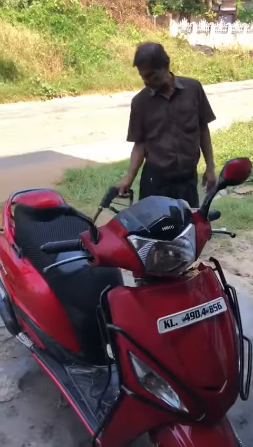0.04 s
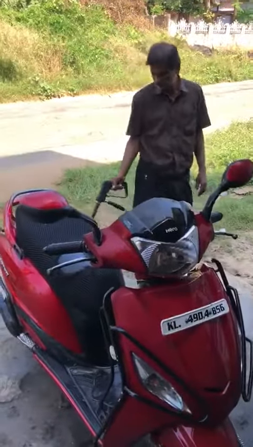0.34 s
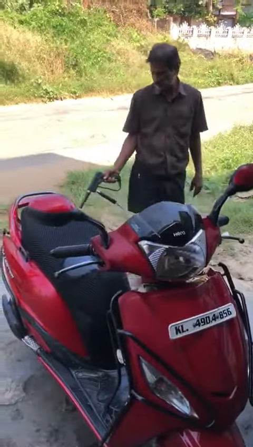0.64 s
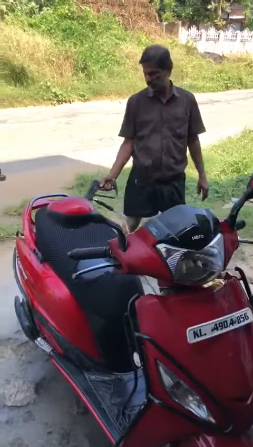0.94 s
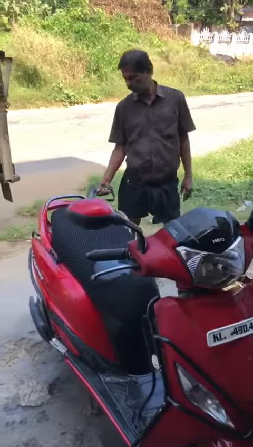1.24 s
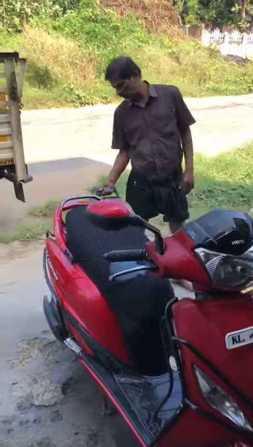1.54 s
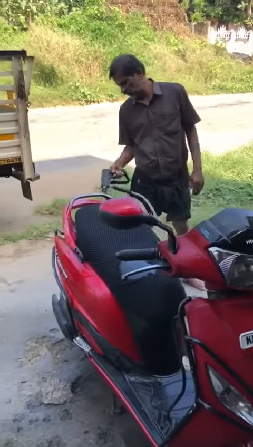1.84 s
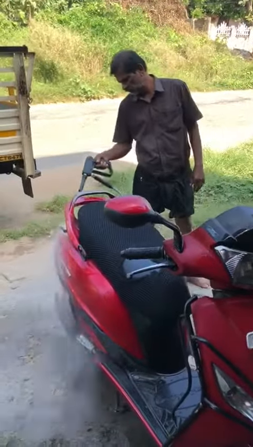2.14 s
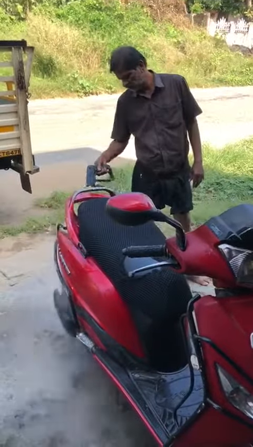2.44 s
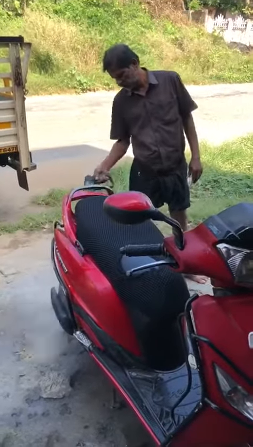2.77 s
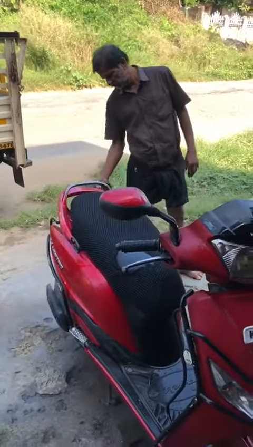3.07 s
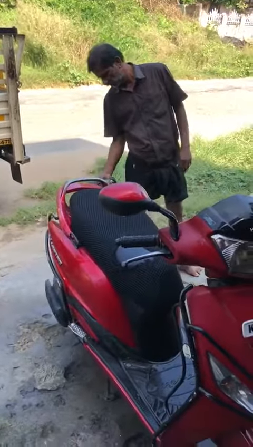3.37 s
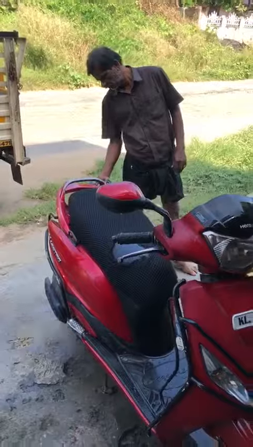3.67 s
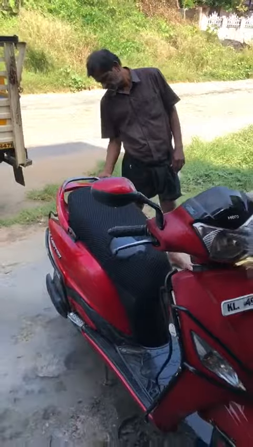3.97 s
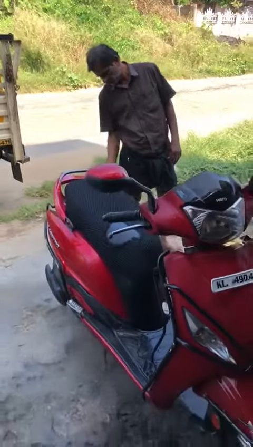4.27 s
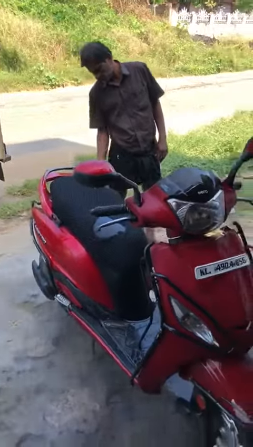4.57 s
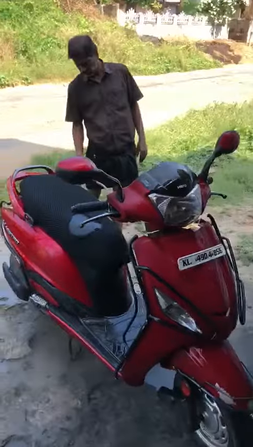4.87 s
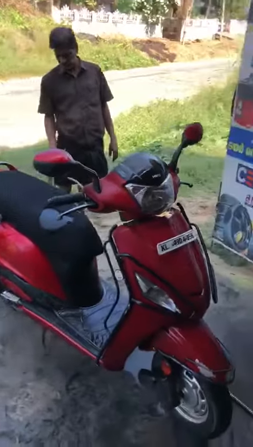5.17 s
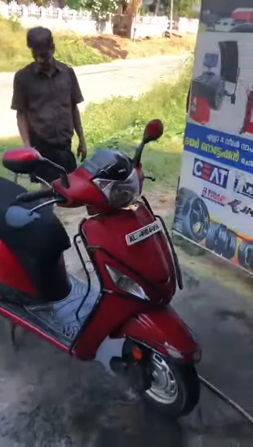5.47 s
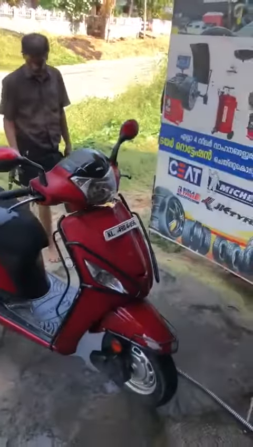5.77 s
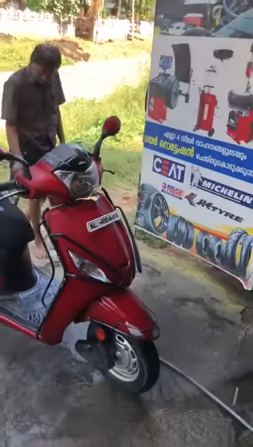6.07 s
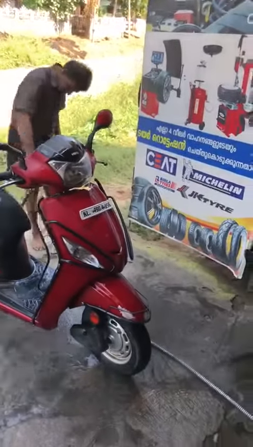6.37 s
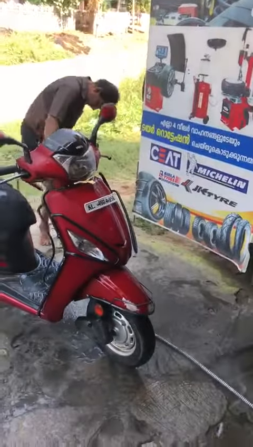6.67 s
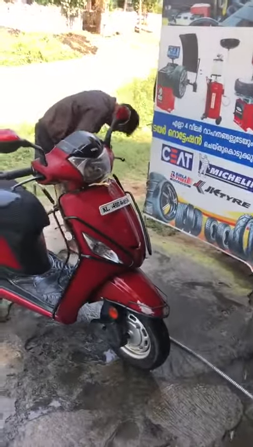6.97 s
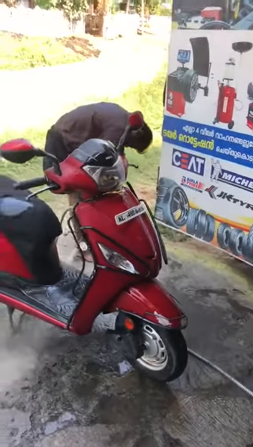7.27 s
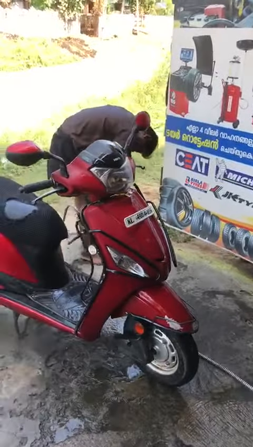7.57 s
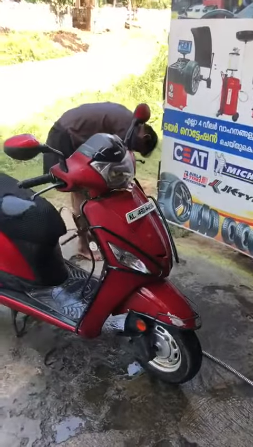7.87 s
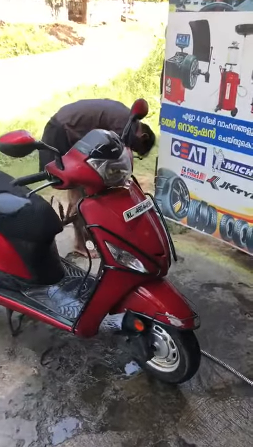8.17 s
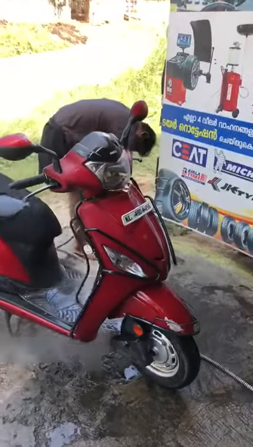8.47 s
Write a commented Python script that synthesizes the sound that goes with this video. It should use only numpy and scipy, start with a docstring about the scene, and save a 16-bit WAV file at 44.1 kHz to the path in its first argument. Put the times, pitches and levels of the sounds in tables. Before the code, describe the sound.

A steam washer lance hisses loudly and without pause as it sweeps over a parked scooter outdoors, a few steps away. The bright hiss flickers slightly and shifts in tone, with a lower rush and rumble as the jet hits panels and ground. A machine drones faintly underneath. Near the end, a quick cluster of soft thumps bumps the microphone.

```python
"""A steam lance sweeps over a parked scooter, outdoors, a few steps away. Fine eddies at the nozzle hiss
without pause; larger ones rush in the plume, roar on panels and ground, and rumble. Shifting echoes and
ringing hollows of the bodywork colour the jet; water in the steam makes it flicker.
A machine drones underneath. Near the end three soft thumps hit the microphone."""
import sys
import numpy as np
from scipy import signal
from scipy.fft import rfft, irfft
from scipy.io import wavfile

SR = 44100
rng = np.random.default_rng(int(sys.argv[2]) if len(sys.argv) > 2 else 0)


def wav_record(signal):
    """Record a signal, one row per channel, as 16-bit PCM in the file named by sys.argv[1]."""
    frames = np.transpose(np.atleast_2d(signal))
    bounded = np.clip(frames, -1, 1)
    # unit amplitude maps onto the largest positive 16-bit level
    quanta = np.round(bounded * 32767).astype(np.int16)
    wavfile.write(sys.argv[1], SR, quanta)


N = 375291
FRAME, HOP = 2048, 512
FRAME_S = np.arange(N // HOP + 5) * HOP / SR
BIN_HZ = np.fft.rfftfreq(FRAME, 1 / SR)
SAMPLE_S = np.arange(N) / SR

# machine drone spectrum: freq_hz, density_db
DRONE_SPECTRUM = [(20, -36), (36, -24), (52, -3), (64, -1), (80, 2), (94, 5), (114, -4), (134, -1),
                  (160, -4), (300, -20), (1000, -33)]
# machine hum lines: pitch_hz, level_db
HUM_LINES = [(95, -67), (180, -62.5), (229, -57.5)]
# thumps on the microphone: start_s, gain_db, decay_s
MIC_THUMPS = [(8.3855, -12, 0.01), (8.4112, -16, 0.0068), (8.4241, -17, 0.011)]

# spectra of the jet's four parts: freq_hz, density_db
HISS_SPECTRUM = [(1000, -52), (3000, -21), (5000, -8), (6000, -3), (7200, -0.7), (9000, 1.5), (11000, 1),
                 (11600, -2), (12100, -13.5)]
RUSH_SPECTRUM = [(500, -31.5), (1300, -13), (2000, -10.5), (2600, -5), (3300, -1), (4500, -1), (6000, -2),
                 (8000, -2), (12000, -39)]
ROAR_SPECTRUM = [(150, -26), (350, -5.5), (520, -2), (680, -4), (850, 1.5), (1000, -2.5), (1300, -1),
                 (1800, 0), (2500, -2.5), (4000, -12), (9000, -45)]
RUMBLE_SPECTRUM = [(40, -30), (110, -14.5), (170, -6), (225, 0.5), (310, -2), (385, -3), (450, -10.5),
                   (700, -11), (2000, -45)]
# nozzle hiss as the lance turns toward and away: time_s, base_db
HISS_CURVE = [(0.0, -17), (0.31, -18), (1.08, -17.5), (1.63, -20.5), (1.79, -17.5), (2.46, -22),
              (2.59, -18.5), (3.04, -20.5), (3.54, -17.5), (3.95, -20), (4.09, -18), (5.82, -16.5),
              (7.04, -18), (7.42, -17.0), (7.56, -20.0), (7.7, -15.5), (7.98, -18.5), (8.51, -19.0)]
# rush of the wider plume: time_s, base_db
RUSH_CURVE = [(0.0, -25), (0.47, -25), (1.13, -25.5), (1.2, -27.5), (2.4, -27.5), (2.6, -25.5),
              (2.77, -28.5), (3.17, -26.5), (3.25, -24), (4.35, -25.5), (5.21, -25), (5.51, -25),
              (6.35, -26.5), (6.62, -28), (7.63, -29), (7.76, -26), (8.11, -29.5), (8.51, -33)]
# roar of steam on panels and ground: time_s, base_db
ROAR_CURVE = [(0.0, -37.5), (0.61, -44.5), (1.15, -35.5), (1.3, -37), (2.23, -37), (3.16, -38.5),
              (3.27, -36), (4.29, -36.0), (4.99, -40.5), (5.13, -38.5), (6.3, -40.5), (7.06, -42.5),
              (7.46, -35.5), (7.53, -44), (8.26, -43)]
# brightness with aim: time_s, hiss_db_per_octave, roar_db_per_octave
AIM_TILTS = [(0, 1.5, -1), (.7, 0.5, -3), (1.2, 3, 2.5), (1.5, 2.5, -2), (2, 3, 0), (2.65, 0, -2.5),
             (2.82, 1, -0.5), (3.16, 3, -1.5), (3.26, -3.5, -2.5), (3.9, 1.5, 6), (4.2, -1, 1),
             (4.5, -0.5, 4.5), (5, 1, 0.5), (5.5, -1, 1.5), (6.2, -0.5, 1.5), (7.4, 1, -2), (8.1, 0.5, 1),
             (8.5, 1, -0.5)]
# bodywork hollows ringing under the jet: centre_s, length_s, freq_hz, boost_db
HOLLOW_MODES = [(.2, 0.46, 2150, 11), (0.582, 0.37, 6030, 6), (.76, 0.49, 1990, 8.5), (.88, 0.23, 5430, 8),
                (1.0, 1.2, 218, 3), (1.57, 0.39, 5470, 7), (1.7, 0.42, 755, 7.5), (1.92, 0.7, 3500, 4.5),
                (2.2, 0.3, 4540, 5), (3.204, 0.48, 800, 5.5), (3.356, 0.31, 4220, 9), (3.603, 1.4, 2030, 4),
                (3.9, .9, 1210, 6), (4.3, 1.4, 380, 2.5), (4.45, 0.8, 205, 6.5), (4.33, 0.55, 6500, 5),
                (5.33, 0.44, 1510, 3), (5.62, 0.25, 4540, 9), (5.763, 0.42, 885, 5),
                (6.28, 0.55, 2570, 8.5), (6.41, 0.32, 3800, 4), (6.55, 0.82, 7400, 4),
                (7.5, 0.36, 10600, 6), (7.62, 0.68, 1710, 5.5), (8.2, 0.36, 4800, 2)]
# flow falters: centre_s, length_s, gain_db
FLOW_DIPS = [(0.098, 0.043, -10), (2.37, 0.044, -2.5)]
# nozzle spurts: centre_s, length_s, hiss_db
NOZZLE_SPURTS = [(0.22, 0.04, 2), (2.932, 0.057, 3.5), (4.2, 0.081, 2.8), (4.419, 0.093, 3),
                 (4.706, 0.081, 2), (6.33, 0.068, 2), (6.822, 0.037, 2), (7.82, 0.04, 2.5),
                 (8.485, 0.11, 2)]
# jet catches a panel: centre_s, length_s, rush_db, roar_db
PANEL_STRIKES = [(0.235, 0.04, -0.5, 4), (1.125, 0.046, 3, 3.5), (1.741, 0.06, 3, -2.5),
                 (1.98, 0.062, 2.5, 4), (2.707, 0.035, 5.5, 3), (3.28, 0.06, 1, 1), (3.561, 0.06, 0, 4),
                 (5.37, 0.04, 2, 6), (5.882, 0.04, -1.5, 5), (7.29, 0.05, 1, 1), (8.38, 0.16, 4.5, 9.5)]
# jet slips off the bodywork; the first row instead extends the flow falter near 0.1 s: centre_s, length_s,
# rush_db, roar_db, rumble_db
JET_LULLS = [(0.113, 0.025, 0, -2, -2), (1.897, 0.08, -0.5, -2, -11), (2.26, 0.051, -2.5, -4.5, -11),
             (3.16, 0.045, 0.5, -3, -5), (4.975, 0.057, -2, -7, 0), (5.21, 0.038, -2.5, 0, -12),
             (7.168, 0.062, -2, -6, 1), (7.37, 0.05, 0, -1.5, -13)]


def gain_of(db):
    """Decibels to amplitude."""
    return 10 ** (np.asarray(db) / 20)


def unit_rms(x):
    """Scale to rms 1."""
    return x / np.sqrt(np.mean(x ** 2) + 1e-20)


def colour(spectrum, freq_hz):
    """Gain of a spectrum table at freq_hz."""
    knots_hz, knots_db = np.transpose(spectrum)
    return gain_of(np.interp(np.log(freq_hz + 1), np.log(knots_hz + 1), knots_db))


def per_frame(curve):
    """A (time_s, value) curve at every frame."""
    return np.interp(FRAME_S, *np.transpose(curve))


def per_sample(frames):
    """Frame values at every sample."""
    return np.interp(SAMPLE_S, FRAME_S, frames)


def bell(centre_s, length_s):
    """Gaussian swell of height 1."""
    return np.exp(-2 * ((FRAME_S - centre_s) / length_s) ** 2)


def swells_db(events, stretch=1):
    """One bell per event, summed; one curve per dB column."""
    return sum(np.outer(dbs, bell(centre_s, length_s * stretch)) for centre_s, length_s, *dbs in events)


def drift(fastest_hz):
    """Random wander per frame, rms 1."""
    rates_hz = fastest_hz * np.geomspace(0.1, 1, num=16)
    cycles = rates_hz * FRAME_S[:, None] + rng.random(len(rates_hz))
    return unit_rms(np.sin(2 * np.pi * cycles).sum(1))


def patches(length_s, width_hz):
    """Smooth random field over time and frequency, rms 1."""
    white = rng.standard_normal((len(FRAME_S), len(BIN_HZ)))
    along = np.fft.fftfreq(len(FRAME_S), HOP / SR)[:, None] * length_s
    across = np.fft.rfftfreq(len(BIN_HZ), SR / FRAME) * width_hz
    blur = np.exp(-2 * (along ** 2 + across ** 2))
    return unit_rms(np.fft.irfft2(np.fft.rfft2(white) * blur, white.shape))


def machine(drone_db, waver_hz):
    """Low drone with wavering hum lines; sinks a little around the jet's lulls."""
    shape = colour(DRONE_SPECTRUM, np.fft.rfftfreq(N, 1 / SR))
    drone = gain_of(drone_db) * unit_rms(irfft(rfft(rng.standard_normal(N)) * shape, N))
    for centre_hz, level_db in HUM_LINES:
        pitch_hz = centre_hz + waver_hz * per_sample(drift(fastest_hz=8))
        drone += np.sqrt(2) * gain_of(level_db) * np.sin(2 * np.pi * np.cumsum(pitch_hz) / SR)
    sink_db = 0.81 * swells_db(JET_LULLS, stretch=3.8).mean(0)
    return drone * gain_of(per_sample(sink_db))


def thumps(sweep_cycles, rise_s):
    """Quick falling chirps: highs arrive first, lows trail."""
    out = np.zeros(N)
    for start_s, gain_db, decay_s in MIC_THUMPS:
        age_s = np.maximum(SAMPLE_S - start_s, 1e-6)
        envelope = (1 - np.exp(-(age_s / (2 * rise_s)) ** 2)) * np.exp(-age_s / decay_s)
        out += gain_of(gain_db) * envelope * np.sin(2 * np.pi * sweep_cycles * np.log(age_s / rise_s))
    return out


def echoes(strength, longest_ms, sway_ms, sway_hz, scatter_hz, count):
    """Short echoes off bodywork and ground ripple the spectrum, shifting as the lance moves."""
    reflected = strength * BIN_HZ / np.hypot(BIN_HZ, scatter_hz)  # long waves bend round the panels
    paths = 1 + 0j
    for base_ms in np.linspace(1, longest_ms, count):
        delay_ms = base_ms + rng.uniform(-0.111, 0.1) + sway_ms * drift(sway_hz)
        weight = drift(sway_hz)[:, None] / np.sqrt(count)
        paths = paths + reflected * weight * np.exp(-2j * np.pi * delay_ms[:, None] * BIN_HZ / 1000)
    return abs(paths) / np.sqrt(np.mean(abs(paths) ** 2, 1, keepdims=True))


def hollows(width_hz, widening):
    """Resonances swell and fade as the jet passes; higher ones are broader."""
    total_db = np.zeros((len(FRAME_S), len(BIN_HZ)))
    for centre_s, length_s, freq_hz, boost_db in HOLLOW_MODES:
        peak = np.exp(-((BIN_HZ - freq_hz) / (width_hz + widening * freq_hz)) ** 2)
        total_db += boost_db * bell(centre_s, length_s)[:, None] * peak
    return gain_of(total_db)


def aim_tilt(column, pivot_hz):
    """The jet beams its treble: aim tilts the spectrum within an octave of the pivot."""
    db_per_octave = per_frame(np.array(AIM_TILTS)[:, [0, column]])
    octaves = np.clip(np.log2((BIN_HZ + 1) / pivot_hz), -1, 1)
    return gain_of(db_per_octave[:, None] * octaves)


def sputter(depth_db, corner_hz):
    """Water in the steam makes the flow flicker."""
    rate_hz = np.fft.rfftfreq(N, 1 / SR)
    band = (rate_hz > 10) / (1 + (rate_hz / corner_hz) ** 2)
    flicker = unit_rms(irfft(rfft(rng.standard_normal(N)) * band, N))
    return unit_rms(gain_of(depth_db * flicker))


def jet_levels_db(hiss_gust_db, rush_gust_db, roar_gust_db):
    """Hiss, rush, roar, rumble: slow sweep of the lance, brief events, shared gusts."""
    dip_db = swells_db(FLOW_DIPS)[0]
    spurt_db = swells_db(NOZZLE_SPURTS)[0]
    rush_flare_db, roar_flare_db = swells_db(PANEL_STRIKES)
    rush_lull_db, roar_lull_db, rumble_lull_db = swells_db(JET_LULLS)
    gust = drift(fastest_hz=18)
    hiss_db = per_frame(HISS_CURVE) + spurt_db + hiss_gust_db * gust
    rush_db = per_frame(RUSH_CURVE) + rush_flare_db + rush_gust_db * gust
    roar_db = per_frame(ROAR_CURVE) + roar_flare_db + roar_gust_db * gust
    rumble_db = -11.5 + 0.75 * rush_db + 0.4 * roar_db  # large eddies grow with both
    return (hiss_db + dip_db, rush_db + dip_db + rush_lull_db,
            roar_db + dip_db + roar_lull_db, rumble_db + rumble_lull_db)


def turbulence(level_db, spectrum, shaping, trim_db, patchy_db, flutter_db):
    """Coloured noise that gusts in patches and flutters as a whole."""
    white = rng.standard_normal((len(FRAME_S), len(BIN_HZ), 2)) @ np.array([1, 1j])
    gusts = gain_of(patchy_db * patches(length_s=0.07, width_hz=950))
    frames = white * colour(spectrum, BIN_HZ) * shaping * gusts
    _, noise = signal.istft(frames.T, nperseg=FRAME, noverlap=FRAME - HOP)
    envelope_db = level_db + trim_db + flutter_db * drift(fastest_hz=35)
    return unit_rms(noise[:N]) * gain_of(per_sample(envelope_db))


def steam_jet():
    """Fine eddies hiss at the nozzle; larger ones downstream rush, roar and rumble."""
    bodywork = echoes(strength=0.86, longest_ms=10, sway_ms=0.025, sway_hz=6, scatter_hz=1100, count=24)
    bodywork *= hollows(width_hz=34, widening=0.009)
    hiss_shaping = bodywork * aim_tilt(column=1, pivot_hz=8840)
    roar_shaping = bodywork * aim_tilt(column=2, pivot_hz=1240)
    hiss_db, rush_db, roar_db, rumble_db = jet_levels_db(
        hiss_gust_db=0.08, rush_gust_db=0.58, roar_gust_db=0.28)
    hiss = turbulence(hiss_db, HISS_SPECTRUM, hiss_shaping, trim_db=0.52, patchy_db=1.3, flutter_db=0.85)
    rush = turbulence(rush_db, RUSH_SPECTRUM, bodywork, trim_db=1.54, patchy_db=1.05, flutter_db=0.8)
    roar = turbulence(roar_db, ROAR_SPECTRUM, roar_shaping, trim_db=1.1, patchy_db=0.2, flutter_db=1.1)
    rumble = turbulence(rumble_db, RUMBLE_SPECTRUM, bodywork,
                        trim_db=0.45, patchy_db=-1.1, flutter_db=1.65)
    nozzle = hiss * sputter(depth_db=0.67, corner_hz=400)
    plume = (rush + roar) * sputter(depth_db=0.4, corner_hz=300)
    return nozzle + plume + rumble


def scene():
    """Jet, machine and thumps, the same in both channels."""
    mono = steam_jet() + machine(drone_db=-51, waver_hz=2.7) + thumps(sweep_cycles=1.2, rise_s=0.00046)
    return np.array([mono, mono])


def record(dry):
    """Steep low-pass."""
    cutoff_hz = 12150
    taps = signal.firwin(401, cutoff_hz, window=("kaiser", 9), fs=SR)
    return signal.oaconvolve(dry, taps[None], "same", axes=1)


dry = scene()
out = record(dry)
wav_record(out)
```